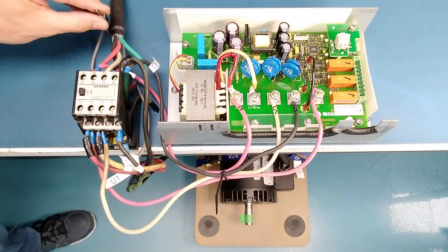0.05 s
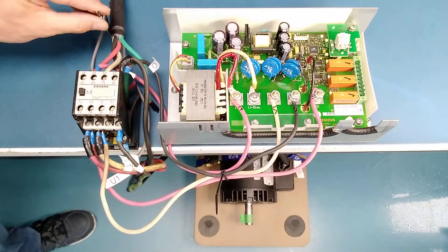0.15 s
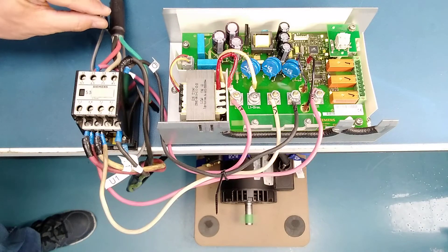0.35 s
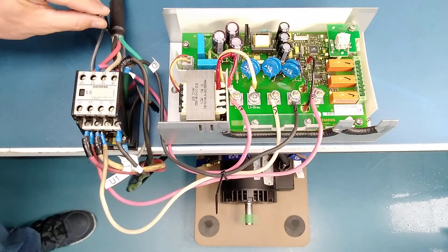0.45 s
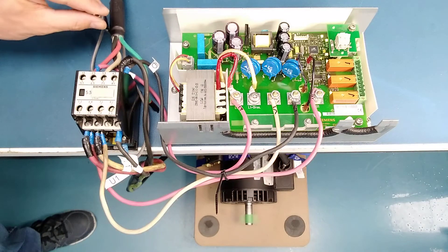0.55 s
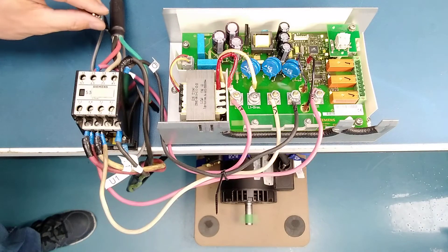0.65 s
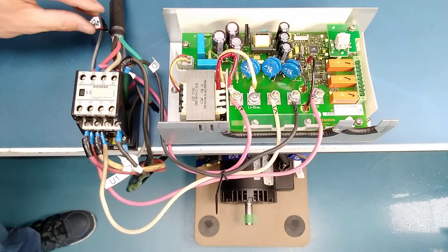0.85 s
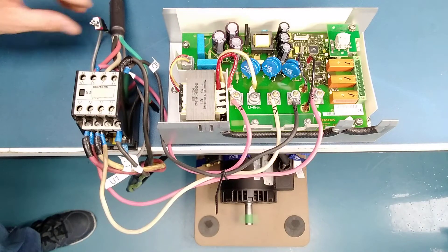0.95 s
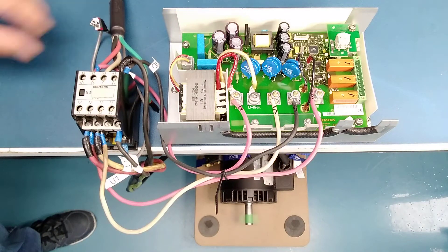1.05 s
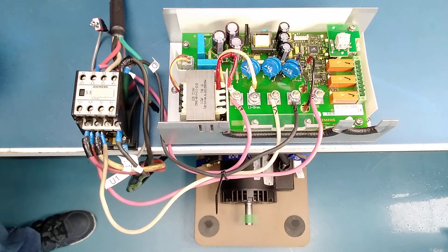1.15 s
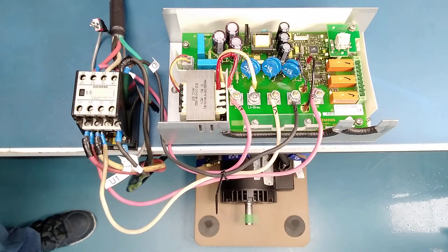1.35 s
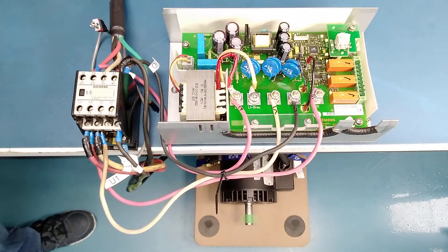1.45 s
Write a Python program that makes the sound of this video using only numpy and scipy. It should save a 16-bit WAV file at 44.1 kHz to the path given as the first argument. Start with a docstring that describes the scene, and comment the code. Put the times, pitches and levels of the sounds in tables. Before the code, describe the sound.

One loud, sharp clack of an electrical contactor starts a small motor, which whines up quickly and settles into a much quieter hum with light ticking and rubbing. The microphone is beside the bench in a quiet workshop.

```python
"""A quiet workshop, one microphone by the workbench. A contactor snaps shut on the bench, the room
answers, and a small four-pole induction motor starts on the floor below. It growls and whines up to
speed in a fifth of a second, then runs on: its frame hums, a flawed bearing ball ticks in waves as
the cage carries it round, and the shaft rubs with a hiss on every turn. Soft low bumps come and go."""
import sys
import numpy as np
from scipy import signal
from scipy.fft import rfft, irfft
from scipy.io import wavfile
from scipy.ndimage import map_coordinates

SR = 44100
rng = np.random.default_rng(int(sys.argv[2]) if len(sys.argv) > 2 else 0)


def log_audio(samples):
    """Write samples as a 16-bit WAV file to the path given in sys.argv[1]."""
    # one column per channel
    frames = np.atleast_2d(samples).T
    # limit to full scale, then quantise
    limited = np.clip(frames, -1, 1)
    pcm = np.round(limited * 32767).astype(np.int16)
    wavfile.write(sys.argv[1], SR, pcm)


N = 66150
T = np.arange(N) / SR

# Room tone. Each row: frequency in Hz, relative level in dB.
ROOM_TONE = [(25, 2), (100, -2), (400, -9.5), (900, -21.5), (3000, -27.5), (16000, -29.5)]
# Soft bumps around the bench. Each row: start in seconds, level in dB, pitch in Hz.
BUMPS = [(0.061, -57, 79.6), (0.108, -62, 69.8), (.355, -50.5, 70.9), (.44, -64.5, 110), (.52, -61, 120),
         (.67, -63, 61.4), (.87, -62.5, 180.7), (.995, -60, 120), (1.03, -54.5, 85), (1.115, -57, 60),
         (1.191, -51.5, 104), (1.374, -48.5, 99), (1.431, -55.5, 74.1)]

# Armature and contacts touch, slam home and bounce.
# Each row: start in seconds, relative level in dB, low edge of the crack in Hz.
IMPACTS = [(0.2152, -31, 2440), (.2200, -36.5, 3030), (0.222, -24, 6100), (0.2283, -27, 2500),
           (.2290, -10, 3970), (0.2299, 2, 150), (0.235, -17, 1510), (.2435, -10.5, 300),
           (0.2695, -20, 7000)]
# The crack of the plastic case. Each row: frequency in Hz, relative level in dB.
CASE_CRACK = [(40, -40), (120, -8), (400, -36), (900, -14), (2000, 1), (3300, -6.5), (5000, -3),
              (7500, 4.5), (9200, 2.5), (10500, -6.5), (13000, -4.5), (16000, -11)]
CRACK_DB, CRACK_T60_S = -4.5, 0.039
# The contactor's ring. Each row: frequency in Hz, level in dB, seconds to fall 60 dB.
CONTACTOR_MODES = [(628, -27, .1), (840, -22, .05), (1201, -12, .06), (1421, -21, .055), (1730, -21, .045),
                   (2030, -24, .045), (2370, -18, .05), (2511, -18, .05), (5017, -22, .04),
                   (6270, -27, .08), (6817, -17, .05), (6940, -28, .13), (7360, -22, .075),
                   (7960, -26, .12), (8061, -16, .045), (8265, -27, .13), (8545, -26, .09),
                   (8945, -22, .075), (9126, -25, .085)]
# The bench's modes. Each row: start in seconds, frequency in Hz, level in dB, seconds to fall 60 dB.
BENCH_MODES = [(0.21, 69, -47.5, .25), (.238, 177, -23.5, 0.077), (.2435, 212, -19, 0.12),
               (.243, 248, -32.5, 0.093), (.256, 428, -25.5, 0.099)]
# The room's answer to the clack. Each row: frequency in Hz, relative level in dB.
REVERB = [(30, -43), (100, 0.5), (300, 8), (1200, -1.5), (2300, -5.5), (3500, -6), (5500, -2.5), (7000, 6),
          (9000, 6.5), (10500, -7), (16000, -10)]
REVERB_DB, REVERB_T60_S, REVERB_BUILD_S = -21, .3, 0.0077

# The shaft's run-up. Each row: time in seconds, share of full speed.
SHAFT_SPEED = [(.238, 0.092), (.27, 0.32), (.31, .5), (.35, .72), (.385, .93), (.42, 1)]
SHAFT_HZ, BALL_HZ, CAGE_HZ = 29.8, 70.447, 11.85  # at full speed
# The starting current. Each row: time in seconds, gain in dB.
INRUSH = [(.232, -60), (.25, 0), (.31, -2), (.355, -4), (.385, -6.5), (.43, -12), (.48, -22), (.6, -41)]
# Magnetic growl under that current. Each row: frequency in Hz, relative level in dB.
GROWL = [(180, -40.5), (205, -36), (425, -48.5), (595, -37)]
# Rotor slot whine. Each row: frequency at full speed in Hz, relative level in dB.
SLOT_WHINE = [(520, -47.5), (690, -51), (860, -40), (1000, -41), (1130, -40.5), (1240, -41.5)]
# Frame resonances the whine sweeps through. Each row: centre in Hz, width in Hz, gain in dB.
WHINE_PEAKS = [(436, 17, 5.5), (628, 20, 16), (740, 36, 4.5), (1080, 130, -17)]
# The shudder of the start. Each row: frequency in Hz, relative level in dB.
SHUDDER = [(25, -30), (70, 0.5), (200, -6), (450, 8.5), (800, -5), (1150, -1), (1500, -21), (4000, -18)]

# Frame resonances shaken by the balls. Each row: centre in Hz, width in Hz, running level in dB rms.
FRAME_MODES = [(431.2, 30, -62.5), (488.2, 45, -59), (574.3, 39, -54), (626.8, 24.7, -52.5), (736, 99, -60),
               (835, 82, -68.5)]
# The bearing's hum. Each row: frequency at full speed in Hz, level around the 1 s mark in dB rms.
BEARING_HUM = [(576, -62.5), (635, -51.5)]
# Thin whines of the running motor. Each row: frequency at full speed in Hz, level in dB rms.
THIN_WHINES = [(1831, -70), (2242.4, -63), (2337, -65), (2536, -62), (2947, -74), (3162, -68.5),
               (3393, -66.5), (3534, -66.5), (4490, -68), (4638, -77), (6559, -69), (7870, -69),
               (10494, -67), (10524, -66), (11806, -68), (12820, -75), (13000, -67), (13130, -69),
               (14460, -68)]
# The bearing shield's ring. Each row: frequency in Hz, width in Hz, relative level in dB.
SHIELD_MODES = [(1851.5, 43.3, -45.5), (1926, 105, -41.5), (2066, 55, -41.5), (2283, 51, -47.5),
                (2330, 190, -48.5)]
BALL_TICK_S, CAGE_LOADED_S = 1.4603, 1.469  # moment of one tick, and of one pass through the loaded zone
CAGE_SWING_DB, INNER_RACE_DB, TICK_SCATTER_DB, TICK_GROWTH_DB_PER_S = 5, -7, 1.3, 3.5
# The noise of the rolling balls. Each row: frequency in Hz, relative level in dB.
ROLLING = [(30, -23), (300, -7), (950, -4.5), (1130, 2.5), (1400, 2.5), (1600, -32), (1800, 9.5),
           (2600, 5.5), (3500, 3), (4000, 4.5), (4500, -0.5), (5000, -5.5), (6000, -5), (7000, 1.5),
           (7500, 6.5), (8200, 0.5), (10200, 3), (11200, -4), (13000, -2), (15500, -14)]
ROLLING_DB, GRIT_DB = -52, -57
# The hiss of the shaft's rub. Each row: frequency in Hz, relative level in dB.
RUB = [(1000, -12), (2800, -3), (4400, -5.5), (5500, -8.5), (7500, -7), (10400, -4), (11200, -10),
       (12400, -1), (13150, -3), (13700, 0), (15000, -7), (15800, -8)]


def from_db(db):
    """Decibels to gain."""
    return 10 ** (np.asarray(db) / 20)


def rms_one(x):
    """Scale to rms 1."""
    return x / np.sqrt(np.mean(x ** 2) + 1e-20)


def curve(rows):
    """Join (seconds, value) points by straight lines."""
    return np.interp(T, *np.transpose(rows))


def coloured(x, spectrum):
    """Give a steady sound a spectrum; rms 1."""
    hz, db = np.transpose(spectrum)
    bins_hz = np.maximum(np.fft.rfftfreq(N, 1 / SR), 1)
    gain = from_db(np.interp(np.log(bins_hz), np.log(hz), db))
    return rms_one(irfft(rfft(x) * gain, N))


def noise(spectrum):
    """Steady noise with a spectrum; rms 1."""
    return coloured(rng.standard_normal(N), spectrum)


def drift(rate_hz):
    """Slow random wander; rms 1."""
    bins_hz = np.fft.rfftfreq(N, 1 / SR)
    return rms_one(irfft(rfft(rng.standard_normal(N)) / (1 + (bins_hz / rate_hz) ** 2), N))


def resonate(x, hz, width_hz):
    """A resonance with gain 1 at its peak."""
    radius = np.exp(-np.pi * width_hz / SR)
    feedback = [1, -2 * radius * np.cos(2 * np.pi * hz / SR), radius ** 2]
    return signal.lfilter(np.array([1, 0, -1]) * (1 - radius ** 2) / 2, feedback, x + 1e-18)


def resonant_noise(hz, width_hz):
    """Noise in one steep-sided resonance; rms 1."""
    return rms_one(resonate(resonate(rng.standard_normal(N), hz, width_hz), hz, width_hz))


def low_cut(x, hz):
    """Roll off what lies under hz."""
    return signal.sosfilt(signal.butter(2, hz, "high", fs=SR, output="sos"), x)


def decay(t60):
    """Envelope that loses 60 dB in t60 seconds."""
    return np.exp(-np.log(1000) * T / t60)


def ringing(modes):
    """Struck modes as dying sines."""
    return sum(from_db(db) * decay(t60) * np.sin(2 * np.pi * hz * T) for hz, db, t60 in modes)


def delayed(x, start_s):
    """Make a sound begin at start_s."""
    return np.concatenate([np.zeros(int(start_s * SR)), x])[:N]


def cycles(speed, hz, zero_s=0):
    """Cycles made by a part that reaches hz at full speed, counted from zero_s."""
    travel = np.cumsum(speed) / SR
    return hz * (travel - np.interp(zero_s, T, travel))


def wave(turns):
    """Cosine of a cycle count."""
    return np.cos(2 * np.pi * turns)


def tones(speed, rows, waver, rate_hz):
    """Sines whose pitch follows speed, each wavering in level."""
    out = 0
    for hz, db in rows:
        tone = np.sqrt(2) * wave(cycles(speed, hz) + rng.random())
        out += from_db(db) * tone * (1 + waver * drift(rate_hz))
    return out


def running_fade(middle_s=0.396, ease_s=0.059):
    """Fade from 0 to 1 around the end of the run-up."""
    return .5 + .5 * np.tanh((T - middle_s) / ease_s)


def bumps(rise_s=0.011, roughness=0.6):
    """Dull knocks around the bench that swell and die in a few hundredths of a second."""
    out = 0
    for start_s, db, hz in BUMPS:
        age = np.maximum(T - start_s, 0) / rise_s
        thud = wave(hz * T + rng.random()) + roughness * resonant_noise(hz, width_hz=66)
        out += from_db(db) * age * np.exp(1 - age) * thud
    return out


def contactor():
    """Each impact cracks the case; the slam rings its modes, thumps the bench and fills the room."""
    cracks = 0
    for start_s, db, edge_hz in IMPACTS:
        crack = low_cut(noise(CASE_CRACK) * decay(CRACK_T60_S), edge_hz)
        cracks += from_db(db + CRACK_DB) * delayed(crack, start_s)
    slam_s = max(IMPACTS, key=lambda row: row[1])[0]
    build = 1 - np.exp(-T / REVERB_BUILD_S)
    reverb = from_db(REVERB_DB) * noise(REVERB) * decay(REVERB_T60_S) * build
    bench = sum(delayed(ringing([mode]), start_s) for start_s, *mode in BENCH_MODES)
    return cracks + delayed(ringing(CONTACTOR_MODES) + reverb, slam_s) + low_cut(bench, hz=76)


def run_up(speed, growl_loss_db=16, chop_hz=170, direct_db=-11, shudder_db=-40.5):
    """The starting current makes the stator growl; slot whine sweeps up through the frame's resonances."""
    growl = tones(np.ones(N), GROWL, waver=0.18, rate_hz=19) * from_db(-growl_loss_db * speed ** 2)
    chop = 1 + 0.53 * wave(chop_hz * T)  # the growl chops the whine
    whine = speed * tones(speed, SLOT_WHINE, waver=0.33, rate_hz=25) * chop
    frame = sum(from_db(db) * resonate(whine, hz, width) for hz, width, db in WHINE_PEAKS)
    shudder = from_db(shudder_db) * noise(SHUDDER) * np.sqrt(speed)
    return from_db(curve(INRUSH)) * (growl + from_db(direct_db) * whine + frame + shudder)


def frame_hum(speed, fade_db_per_s=10):
    """Rolling balls shake the frame's resonances, swelling with the cage; thin whines stand above."""
    body = sum(from_db(db) * resonant_noise(hz, width) for hz, width, db in FRAME_MODES) * speed ** 2
    hum = tones(speed, BEARING_HUM, waver=0.33, rate_hz=29) * running_fade()
    hum *= from_db(-fade_db_per_s * (T - 1))
    swell = 1 + .36 * wave(cycles(speed, CAGE_HZ, zero_s=1.003))
    whines = tones(speed, THIN_WHINES, waver=0.26, rate_hz=11) * running_fade()
    return (body + hum) * swell + whines


def bearing(speed):
    """A flawed ball hits outer and inner race in turn, hardest under load, and rings the shield."""
    cage = wave(cycles(speed, CAGE_HZ, CAGE_LOADED_S))
    load = np.tanh(1.4 * (cage + 0.087))  # flat-topped, positive in the loaded zone
    hits = np.floor(2 * cycles(speed, BALL_HZ, BALL_TICK_S))  # two per spin of the ball
    tick_db = CAGE_SWING_DB * load + INNER_RACE_DB * (hits % 2) + TICK_GROWTH_DB_PER_S * (T - 1)
    tick_db += TICK_SCATTER_DB * rng.standard_normal(N)
    ticks = np.diff(hits, prepend=hits[0]) * from_db(tick_db)
    shield = sum((-1) ** k * from_db(db) * np.exp(-np.pi * width * T) * np.sin(2 * np.pi * hz * T)
                 for k, (hz, width, db) in enumerate(SHIELD_MODES))
    roughness = rng.standard_normal(N) * (1 + .65 * load)
    grit = from_db(GRIT_DB) * rms_one(signal.fftconvolve(roughness, shield)[:N])
    rolling = from_db(ROLLING_DB) * noise(ROLLING) * (1 + 0.033 * load)
    return (signal.fftconvolve(ticks, shield)[:N] + grit) * running_fade() + rolling * speed ** 2


def shaft_rub(speed, level_db=-54.5, swing_db=4.5):
    """The same rough track passes on every turn and presses hardest at one angle."""
    turns = cycles(speed, SHAFT_HZ, zero_s=0.99)
    track = rng.standard_normal(int(SR / SHAFT_HZ))
    friction = map_coordinates(track, [turns % 1 * len(track)], order=3, mode="grid-wrap")
    pressure = from_db(swing_db * (wave(turns) + 0.19 * wave(2 * turns)))
    return from_db(level_db) * coloured(friction * pressure * speed ** 2, RUB)


def scene():
    """The workshop in mono: room tone, bumps, the contactor on the bench and the motor below."""
    speed = curve(SHAFT_SPEED)
    motor = run_up(speed) + frame_hum(speed) + bearing(speed) + shaft_rub(speed)
    return (contactor() + motor + bumps() + from_db(-72.5) * noise(ROOM_TONE))[None]


def record(dry, ceiling=0.8, low_cut_hz=50.7, high_cut_hz=15900):
    """The clack slightly overloads the microphone; the deepest bass and the very top are cut."""
    overloaded = ceiling * np.tanh(dry / ceiling)
    high_cut = signal.ellip(12, .1, 70, high_cut_hz, fs=SR, output="sos")
    return signal.sosfilt(high_cut, low_cut(overloaded, low_cut_hz))


dry = scene()
out = record(dry)
log_audio(out)
```